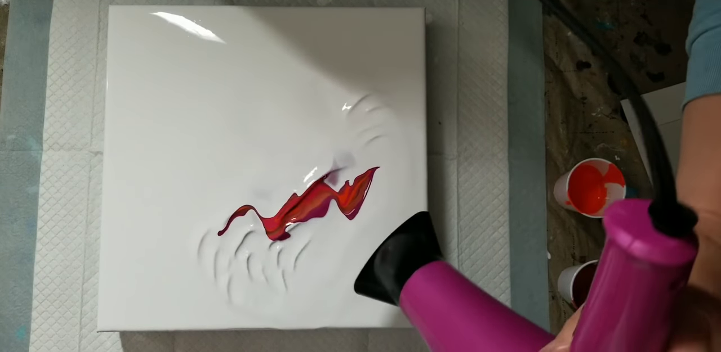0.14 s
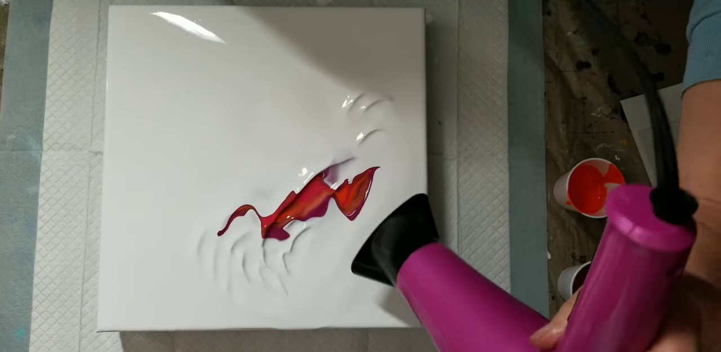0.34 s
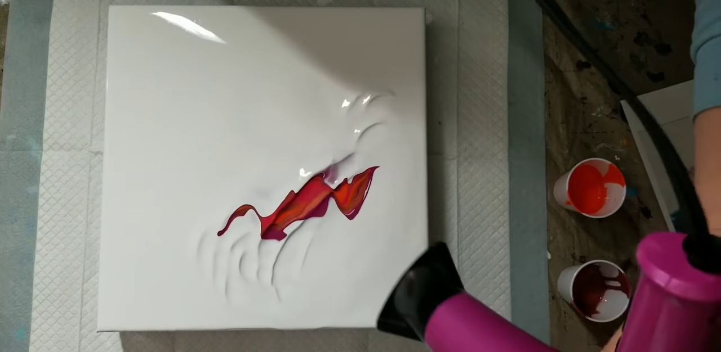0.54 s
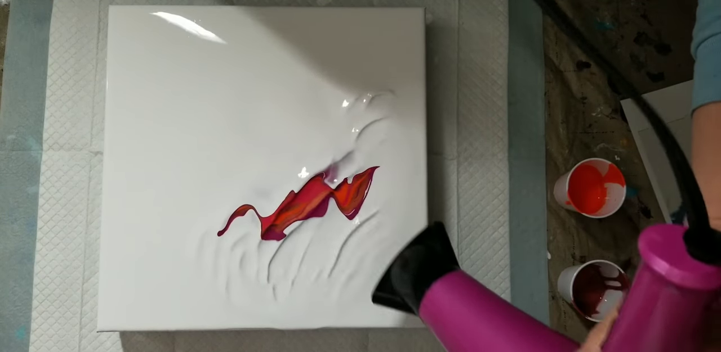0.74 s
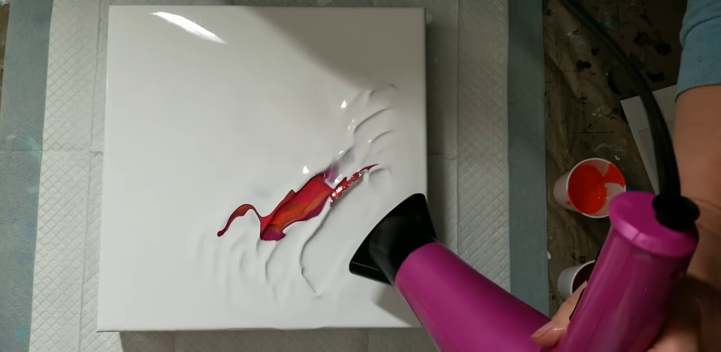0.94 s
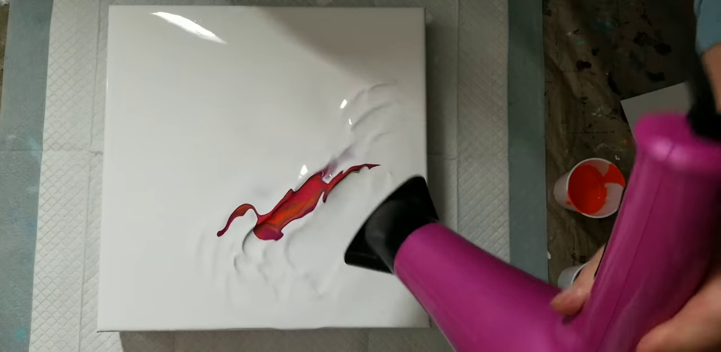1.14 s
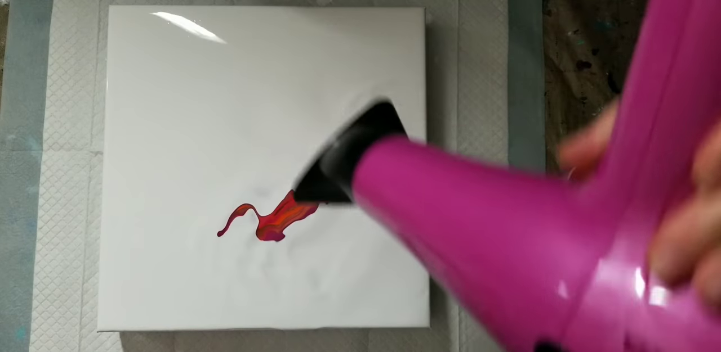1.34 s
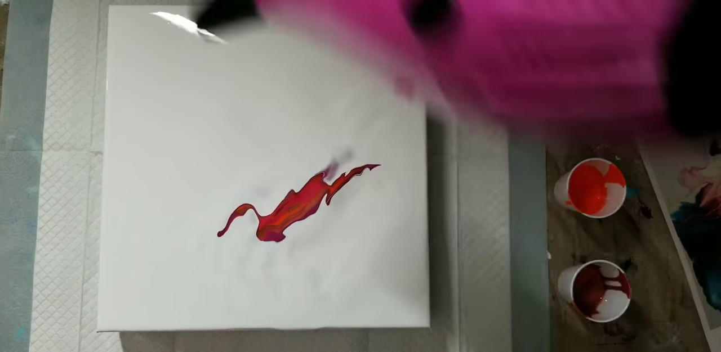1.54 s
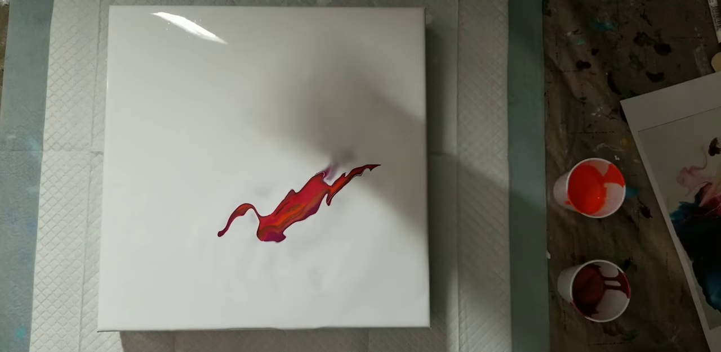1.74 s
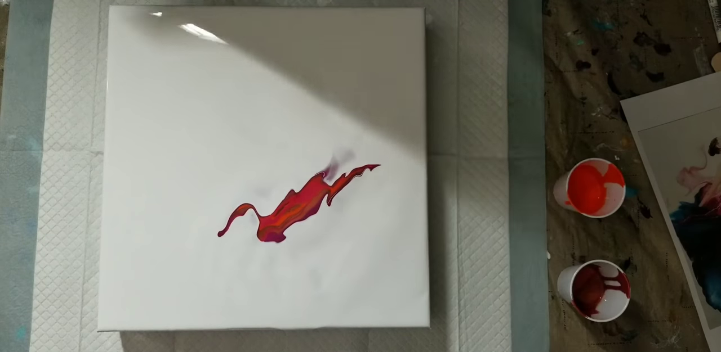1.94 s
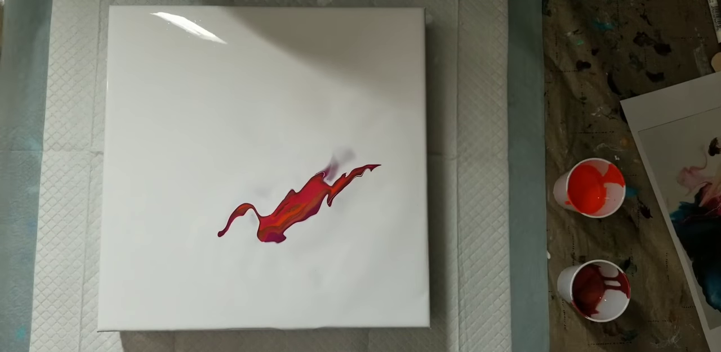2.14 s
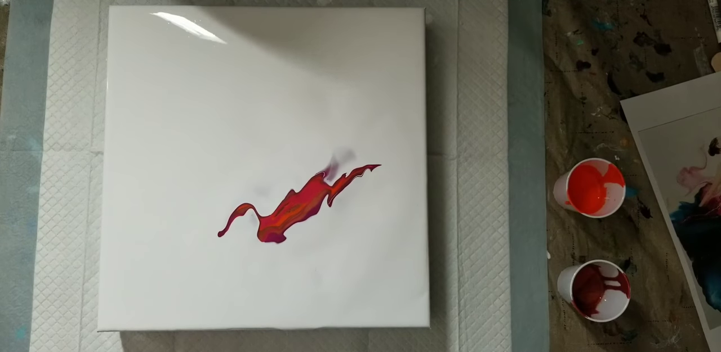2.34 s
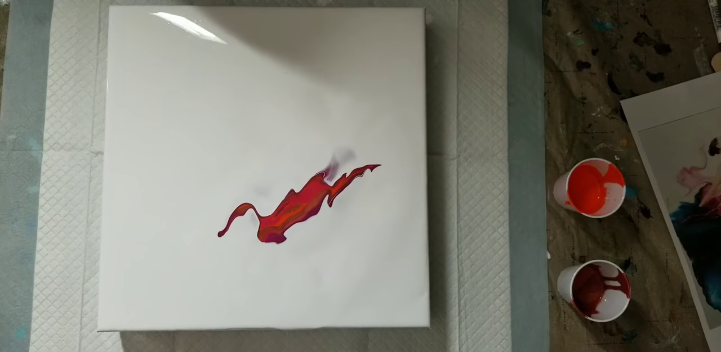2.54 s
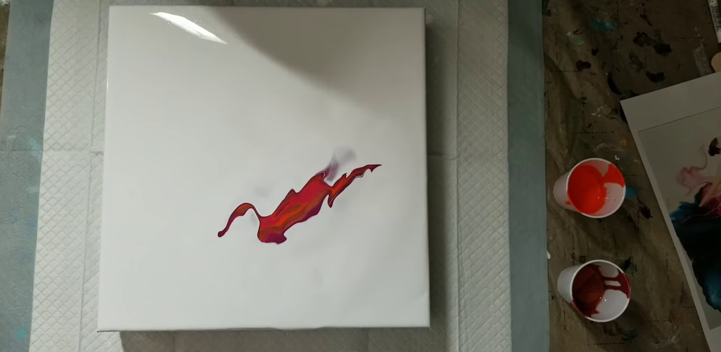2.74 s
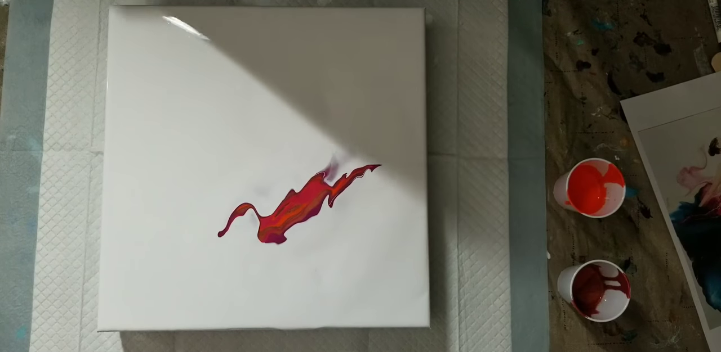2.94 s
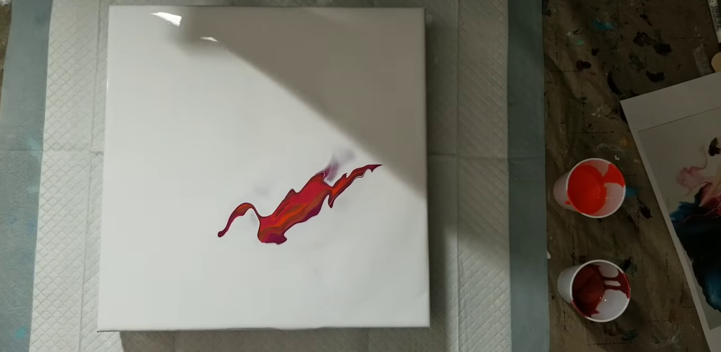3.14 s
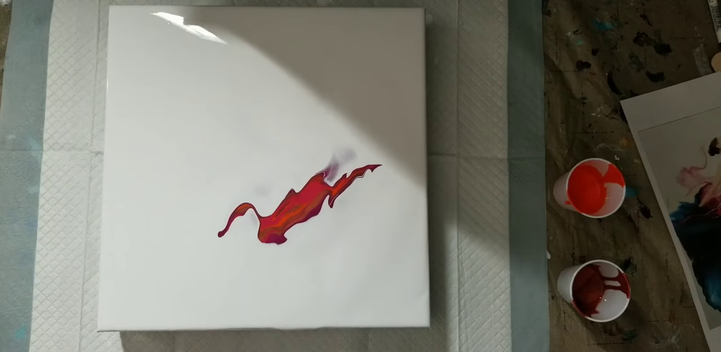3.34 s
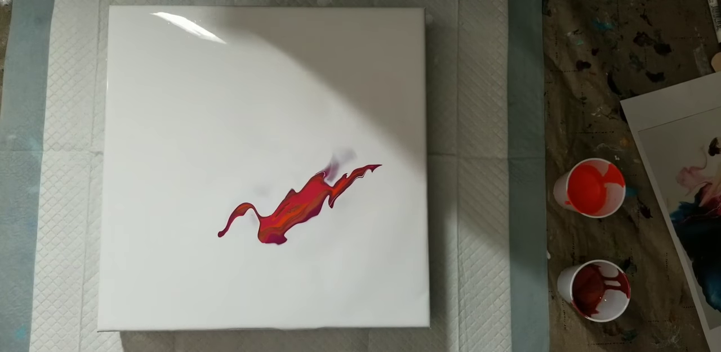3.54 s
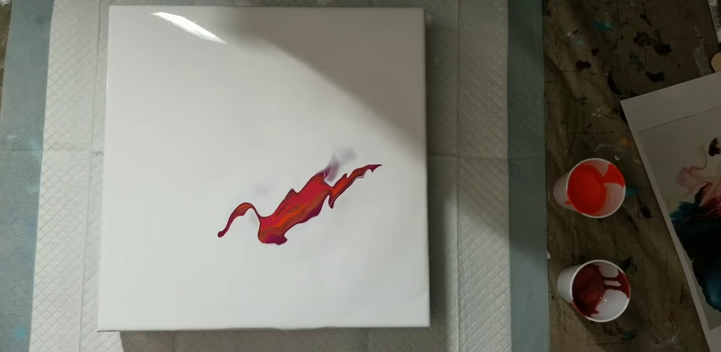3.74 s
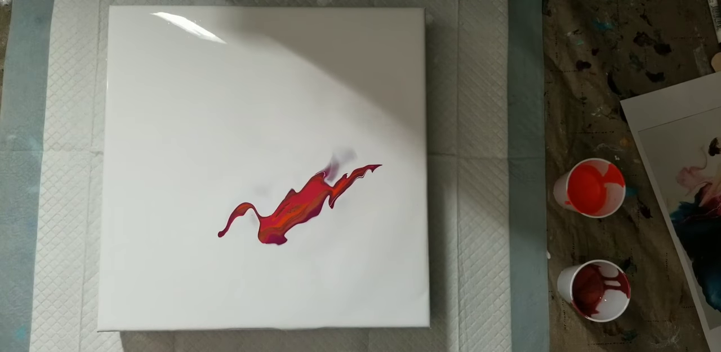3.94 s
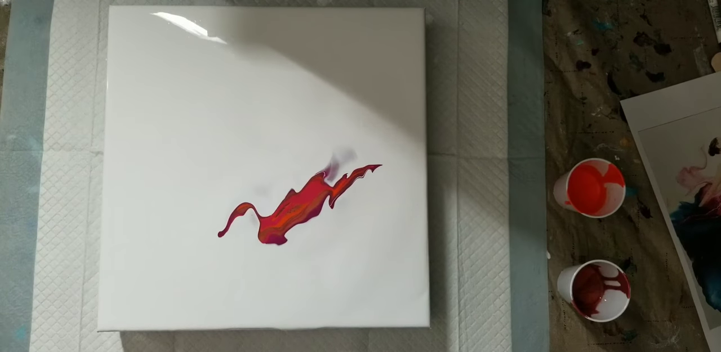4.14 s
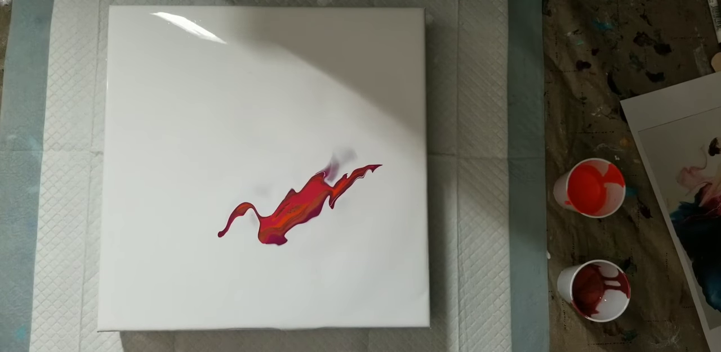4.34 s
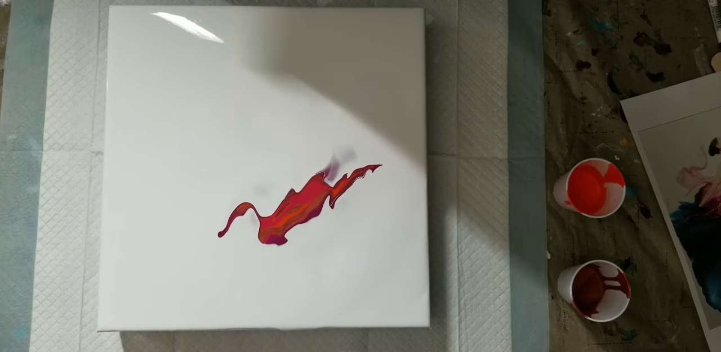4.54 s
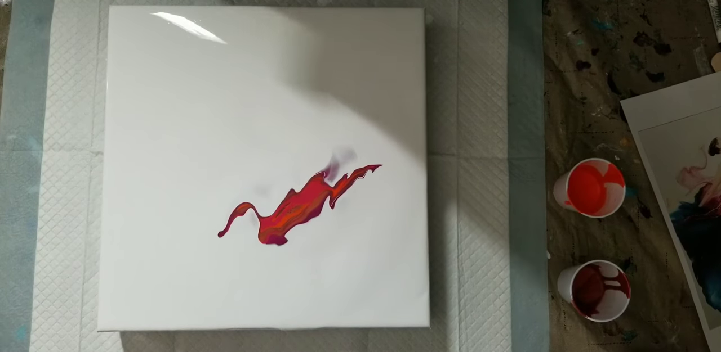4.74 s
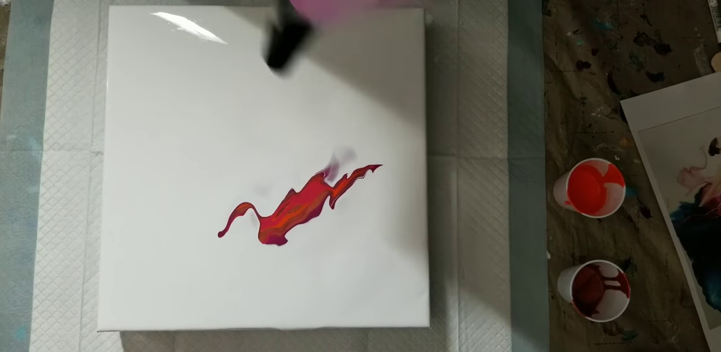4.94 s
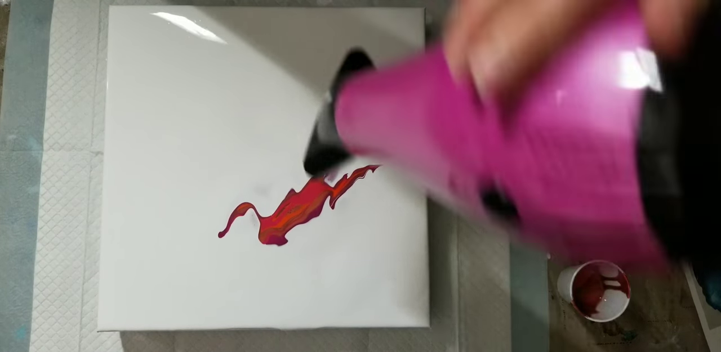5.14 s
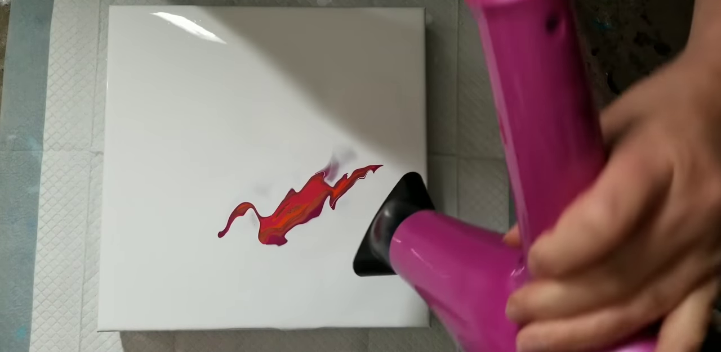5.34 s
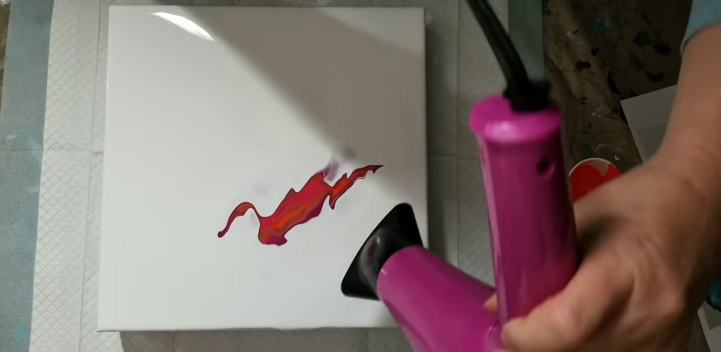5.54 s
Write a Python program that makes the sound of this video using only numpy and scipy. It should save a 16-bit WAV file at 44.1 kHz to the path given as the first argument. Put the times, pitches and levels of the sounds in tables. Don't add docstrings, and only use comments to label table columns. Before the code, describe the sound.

A hair dryer runs on high throughout, already blowing when the sound begins. Broad midrange roar, airy hiss and a steady high fan whine shift colour as it is aimed at a table, swept close past the microphone around a second and a half, held aside a little quieter, then brought close again near five seconds. Close stereo pickup in a small room, with little deep bass.

```python
import sys
import numpy as np
from scipy import signal
from scipy.fft import rfft, irfft, next_fast_len
from scipy.io import wavfile
from scipy.ndimage import uniform_filter1d, map_coordinates

SR = 44100
rng = np.random.default_rng(int(sys.argv[2]) if len(sys.argv) > 2 else 0)


def int16_out(signal):
    q = np.round(np.clip(np.atleast_2d(signal).T, -1, 1) * 32767)
    wavfile.write(sys.argv[1], SR, q.astype(np.int16))


def linear_from_db(decibels):
    return 10 ** (np.asarray(decibels, float) / 20)


N = 247401

# t/s, nearness/dB, housing turned to camera/dB, left minus right/dB, left lags right/ms
SWING = [(0.0, 0, -1.5, -1, 0.06), (1.09, 1, -3.5, -.5, 0.056), (1.36, 0.5, 2.5, -2.5, 0.066),
         (1.53, 4, 1, -4.5, 0.043), (1.64, 3, 0.5, 2.5, -0.045), (1.78, -1, 2.5, 5, -0.21),
         (2.05, -2.5, -2, 2.5, -0.24), (2.4, -4.5, 1, 4.5, -0.27), (2.94, -3.5, 1.5, 3.5, -0.21),
         (3.37, -1.5, 1.5, 3.5, -0.18), (3.69, -1, 0.5, 1.5, -0.18), (3.97, -1.5, 4, 1.5, -0.16),
         (4.72, 1, 0, 1, -0.098), (4.95, 2, 1, 0, -0.042), (5.3, 0.5, 0, -3, 0.08),
         (5.61, -1.5, -3.5, 0, 0.09)]
# f/Hz, density/dB
ROAR_COLOURS = [
    [(100, -51), (170, -20.5), (291, -10.5), (423, -16), (523, -1.5), (675, -5), (849, -3), (1040, -3),
     (1120, -3.5), (1300, -1), (1690, -3), (2860, -120)],
    [(100, -52), (170, -38), (237, -14.5), (409, -11), (468, -5.5), (501, -9), (647, 0.5), (760, -3.5),
     (1030, -1.5), (1300, -7.5), (1690, -38), (2860, -120)],
]
# f/Hz, density/dB
RUSH_COLOURS = [
    [(680, -27), (1150, -8), (1420, -18), (1540, 1), (1830, -1.5), (1980, 0.5), (2080, -5), (2200, -6),
     (2440, -6), (3000, -12.5), (3900, -41), (6600, -120)],
    [(680, -15), (1150, -4), (1260, -15.5), (1430, 2), (1540, 3), (1850, 2.5), (2000, 0.5), (2150, -3),
     (2560, 1), (3000, -11.5), (3900, -34), (6600, -120)],
]
# f/Hz, density/dB
HISS_COLOURS = [
    [(1710, -37), (2900, -9.5), (3540, -5.5), (3920, -1), (4110, -5.5), (4360, -5), (4920, -9), (6300, -6),
     (7410, -8), (8320, -13.5), (8800, -32), (11400, -49), (19400, -120)],
    [(1710, -64), (2900, -5), (3400, -3.5), (4110, -1.5), (4950, -8), (6570, -3.5), (7950, -10),
     (8800, -24), (11400, -51), (19400, -120)],
]
# f/Hz, density/dB
FIZZ_COLOUR = [(5000, -19), (8500, -5), (8870, -6), (9980, -5), (12900, 0), (14000, 0.5), (14600, -4.5)]
# at rest/dB, per dB nearer/dB, per dB turned/dB, while the jet strikes the table/dB
ROAR_LAW = (-29.5, 0.6, -0.05, 3)
RUSH_LAW = (-27, 1.22, 0.78, -0.17)
HISS_LAW = (-28, 1.11, 0.1, -0.4)
FIZZ_LAW = (-35.5, 1, 0.24, 1.1)
# f/Hz, width/Hz
BARREL_MODES = [(1440, 16), (2480, 480)]
FIRST_MODE_LAW = (-34, 1.1, .5, -4)
SECOND_MODE_LAW = (-32.5, 1.5, .5, -1.5)
# t/s, length/s, first mode/dB, second mode/dB
MOUTH_SWEEPS = [(.15, 0.25, 6, 3), (.83, 0.37, 10, -3), (1.15, 0.23, 8, 6.5), (1.33, 0.18, 10, 1),
                (2.214, 0.13, 6, 6.5), (2.5, 0.25, 3, 1), (4.15, .7, 0.5, -19), (4.7, .3, 1.5, 3),
                (4.984, 0.16, 9, 4), (5.18, 0.26, 13.5, 4), (5.6, 0.13, 9, 8.5)]
# t/s, f/Hz
BLADE_PASS = [
    (0.0, 2027.5),
    (0.56, 2030.0),
    (1.12, 2033.0),
    (1.4, 2033.0),
    (1.68, 2026.5),
    (1.96, 2024.5),
    (3.08, 2029.5),
    (5.0, 2029.0),
    (5.32, 2024.5),
    (5.6, 2024.0),
]
BLADE_LEVELS = (-36.5, -39, -53)
HARMONIC_DRIFT = (1.5, 2.5, 3)
# t/s, length/s, lift/dB, left minus right/dB
BLADE_BEAMS = [(.1, 0.21, 3, 6), (.42, .2, 6.5, 3), (.8, 0.36, 5, 0), (1.26, 0.19, 7, -4), (1.5, .3, 8, 3),
               (1.85, .35, 4.5, 6.5), (2.153, 0.31, 6, 6.5), (2.447, 0.55, 3, 10.5), (3.073, 0.32, 12.5, 2),
               (3.357, 0.42, 4, -16.5), (4.302, 0.88, 5, 6), (4.7, .2, 0.5, -3), (5.017, 0.32, 8, 2),
               (5.46, .25, 7.5, -2)]
# t/s, length/s, level/dB, left minus right/dB
SECOND_NULLS = [
    (1.53, 0.14, -12, .1),
    (2.0, .5, -12, -3),
    (3.052, .2, -4, .1),
    (4.15, .7, -5, -16),
    (4.75, 0.18, -2, -12),
    (5.112, 0.33, -9, 5),
    (5.358, .2, -6, -17.5),
    (5.55, .1, -10, -2),
]
# t/s, length/s, lift/dB, left minus right/dB
THIRD_GLINTS = [
    (.9, 0.34, 11, -10),
    (1.75, 0.33, 8, 12),
    (3.3, 1, 6.5, 13),
    (4.552, .3, 7, 20),
    (4.894, .15, 11, 19),
    (5.18, .15, 10, 15),
]
# order/multiple, level/dB
SHAFT_LINES = [(1, -57), (3, -49), (5, -46), (6, -48), (22, -56)]
# f/Hz, share/ratio
DIRECT_SHARE = [(60, .3), (130, 0.57), (300, 0.86), (1000, 0.8), (2500, 0.51), (5000, 0.16), (9000, 0.038),
                (14000, 0.08)]
# f/Hz, left minus right/dB
PORT_TILT = [(60, -32), (200, 1), (600, 1), (4000, 1), (8000, 2.5), (14000, 6)]
# f/Hz, depth/dB
ROOM_RIDGES = [(200, 1.8), (700, 2.8), (2000, 2.6), (4000, 1.6), (12000, 1.1)]
# f/Hz, depth/dB
GUSTS = [(500, .5), (3000, 0.62), (10000, 0.64)]
# f/Hz, depth/dB
TREBLE_DROPOUTS = [(7600, .5), (8800, 4), (10500, 3), (12200, 1)]
# low f/Hz, top f/Hz
RUMBLE_BANDS = [(58, 86), (88, 172)]
# start t/s, length/s, level/dB
UPPER_BURSTS = [(1.36, 0.49, -48), (1.84, .11, -54), (2.21, .05, -56), (2.3, 0.12, -58), (2.45, .06, -56),
                (2.54, 0.35, -59.5), (2.9, 0.069, -63), (3.06, .082, -54), (3.29, 0.044, -51),
                (3.497, .052, -58), (3.59, 0.084, -52), (3.75, 0.14, -65), (3.92, .05, -54),
                (4.03, 0.33, -55.5), (4.373, 0.11, -54), (4.534, 0.041, -49), (4.633, 0.2, -49),
                (4.855, .084, -52), (4.981, 0.35, -51.5)]
# start t/s, length/s, level/dB
LOWER_BURSTS = [(0.0, .02, -60), (1.334, 0.66, -58), (2.216, 0.17, -53), (2.416, 0.13, -64),
                (2.67, .054, -64), (2.763, .11, -56), (3.03, .13, -59), (3.279, .069, -66),
                (3.499, 0.059, -58), (3.6, .07, -64), (3.8, .055, -56), (4.088, .196, -57), (4.7, .07, -56),
                (4.82, 0.061, -57), (4.95, .16, -57), (5.14, .26, -53), (5.528, 0.057, -57)]


def airflow(power):
    frame = 1024
    hz, t, z = signal.stft(rng.standard_normal((3, N)), SR, nperseg=frame)
    intake_ms = 0.13 * on_table(t) / (1 + (2300 / (hz[:, None] + 1)) ** 8)
    lag_s = (curves(SWING, t)[3] + intake_ms) / 1000
    turn = np.exp(-1j * np.pi * hz[:, None] * lag_s)
    share = np.clip(along(DIRECT_SHARE, hz), 0, 1)[:, None]
    direct = np.sqrt(share) * z[0] * np.array([turn, turn.conj()])
    ports = direct + np.sqrt(1 - share) * z[1:]
    room = along(ROOM_RIDGES, hz)[:, None] * mottle(ports.shape, bins=2, frames=30)
    gusts = along(GUSTS, hz)[:, None] * mottle(z[:1].shape, bins=12, frames=4)
    dropouts = along(TREBLE_DROPOUTS, hz)[:, None] * mottle(ports.shape, bins=4, frames=2)
    tilt = along(PORT_TILT, hz)[:, None] * [[[0.5]], [[-0.5]]]
    gain = np.sqrt(power(hz, t) * len(hz)) * linear_from_db(room + gusts + dropouts + tilt)
    return signal.istft(ports * gain, SR, nperseg=frame)[1][:, :N]


def turbulence(hz, t):
    near_db, _, pan_db, _ = curves(SWING, t)
    side = np.array([pan_db, -pan_db]) / 2
    thin_db = np.minimum(near_db - 0.5, 0) / (1 + (hz[:, None] / 650) ** 6)
    roar = posed(ROAR_COLOURS, hz, t, law_db(ROAR_LAW, t) + 0.5 * side) * linear_from_db(2 * thin_db)
    rush = posed(RUSH_COLOURS, hz, t, law_db(RUSH_LAW, t) + 0.53 * side)
    hiss = posed(HISS_COLOURS, hz, t, law_db(HISS_LAW, t) + 1.02 * side)
    fizz = shaped(linear_from_db(along(FIZZ_COLOUR, hz)), law_db(FIZZ_LAW, t) + 1.3 * side)
    return linear_from_db(2.5) * (roar + rush + hiss + fizz)


def barrel(hz, t):
    laws = (FIRST_MODE_LAW, SECOND_MODE_LAW)
    power = 0
    for (mode_hz, width_hz), law, lift_db in zip(BARREL_MODES, laws, swells(MOUTH_SWEEPS, t)):
        resonance = 1 / (1 + ((hz - mode_hz) * 2 / width_hz) ** 2)
        sway_db = 1.5 * np.interp(t, moments(), wobble(6))
        power = power + shaped(resonance, law_db(law, t) + lift_db + sway_db - 0.5)
    return power


def fan():
    blades = 7
    blade_hz = curves(BLADE_PASS)[0]
    shaft = 2 * np.pi * np.cumsum(blade_hz * (1 + 0.0001 * wobble(25))) / SR / blades
    lag = np.pi * blade_hz / blades * curves(SWING)[3] / 1000
    angle = np.array([shaft - lag, shaft + lag])
    out = 0
    for k, db in enumerate(whine_db()):
        flutter_db = 1.2 * np.array([wobble(12), wobble(12)])
        out = out + linear_from_db(db + flutter_db) * np.sin((k + 1) * blades * angle)
    near_db = law_db(RUSH_LAW) + 25.5
    rung_db = 0.89 * swells(MOUTH_SWEEPS)[0] + 5 * (1 - on_table())
    for order, db in SHAFT_LINES:
        fading_db = 2.4 * np.array([wobble(4.17), wobble(4.68)])
        drift = 0.53 * wobble(12)
        level_db = db + near_db + fading_db + (order == 5) * rung_db
        out = out + linear_from_db(level_db) * np.sin(order * angle + drift)
    return np.sqrt(2) * out


def whine_db():
    near_db = curves(SWING)[0]
    ports = np.array([[0.5], [-0.5]])
    steady = (0.5 * near_db, 0.32 * near_db + 3.5 * on_table(), 0.3 * near_db)
    events = (BLADE_BEAMS, SECOND_NULLS, THIRD_GLINTS)
    out = []
    for db, base_db, rows, drift_db in zip(BLADE_LEVELS, steady, events, HARMONIC_DRIFT):
        lift_db, pan_db = swells(rows)
        out.append(db + base_db + lift_db + ports * (pan_db + 2 * drift_db * wobble(4)))
    return out


def bass():
    noise = rng.standard_normal((2, N)) + 1.2 * rng.standard_normal(N)
    lower = unit(band(noise, *RUMBLE_BANDS[0], order=4))
    upper = unit(band(noise, *RUMBLE_BANDS[1]))
    hum = linear_from_db(-7 + 2.5 * wobble(8)) * np.sin(2 * np.pi * 119.5 * moments())
    upper_gain = linear_from_db(-0.4) * gate(UPPER_BURSTS, shut_db=-80, lumps_db=2)
    lower_gain = linear_from_db(-4.5) * gate(LOWER_BURSTS, shut_db=-90, lumps_db=2.5)
    upper_ports = upper_gain * (upper + hum) * linear_from_db([[-1.5], [1.5]])
    return upper_ports + lower_gain * lower * linear_from_db([[-3.5], [3.5]])


def gate(rows, shut_db, lumps_db):
    level_db = shut_db + 3.5 * wobble(6)
    for s, length, db in rows:
        level_db[max(round(s * SR), 0):round((s + length) * SR)] = db
    opening_s = 0.019
    return linear_from_db(uniform_filter1d(level_db, round(opening_s * SR) + 1) + lumps_db * wobble(14))


def on_table(t=None):
    return 1 - np.clip((0.02 - curves(SWING, t)[3]) / 0.091, 0, 1)


def law_db(law, t=None):
    near_db, turned_db = curves(SWING, t)[:2]
    return law[0] + law[1] * near_db + law[2] * turned_db + law[3] * on_table(t)


def posed(colours, hz, t, db):
    table, aside = (shaped(linear_from_db(along(c, hz)), db) for c in colours)
    return on_table(t) * table + (1 - on_table(t)) * aside


def shaped(gain, db):
    return (gain ** 2 / np.sum(gain ** 2))[:, None] * linear_from_db(2 * db)[..., None, :]


def swells(rows, t=None):
    s, length, *cols = np.transpose(rows)
    coarse = np.arange(0, N / SR + 0.01, 0.005)
    bumps = np.exp(-np.abs(2 * (coarse[:, None] - s) / length) ** 3)
    return np.array([np.interp(moments(t), coarse, bumps @ c) for c in cols])


def mottle(shape, bins, frames):
    field = rng.standard_normal(shape)
    for _ in range(2):
        field = uniform_filter1d(uniform_filter1d(field, bins, 1), frames, 2)
    return unit(field)


def band(x, low_hz, top_hz, order=16):
    m = next_fast_len(N)
    hz = np.fft.rfftfreq(m, 1 / SR)
    gain = (hz < top_hz) / np.sqrt(1 + (low_hz / (hz + 1)) ** order)
    return irfft(rfft(x, m) * gain, m)[:, :N]


def moments(t=None):
    return np.arange(N) / SR if t is None else t


def curves(rows, t=None):
    s, *cols = np.transpose(rows)
    return [np.interp(moments(t), s, c) for c in cols]


def along(points, hz):
    f, v = np.transpose(points)
    return np.interp(np.log(hz + 1), np.log(f + 1), v)


def wobble(rate):
    return map_coordinates(rng.standard_normal(int(N * rate / SR) + 4), [np.arange(N) * rate / SR])


def unit(x):
    return x / np.sqrt(np.mean(np.abs(x) ** 2) + 1e-20)


def scene():
    dryer = airflow(lambda hz, t: turbulence(hz, t) + barrel(hz, t)) + fan()
    return band(dryer, low_hz=183, top_hz=14560) + bass()


def roll_off(x):
    return signal.sosfilt(signal.butter(12, 14930, fs=SR, output="sos"), x)


def record(dry):
    mix = dry / (1 + np.abs(dry / 0.99) ** 4) ** 0.25
    return roll_off(mix)


dry = scene()
out = record(dry)
int16_out(out)
```